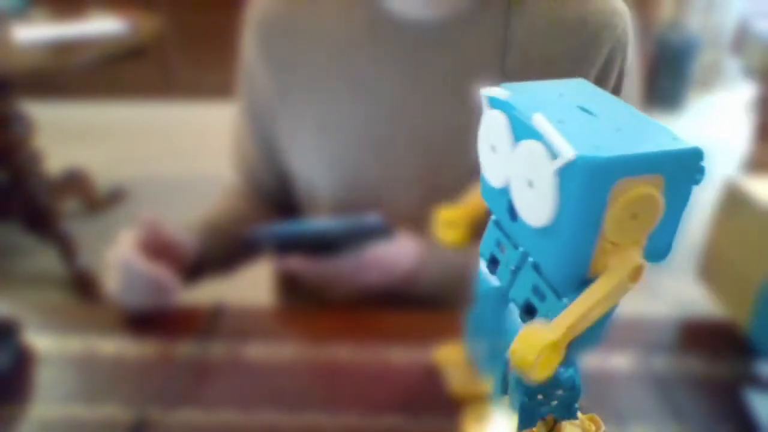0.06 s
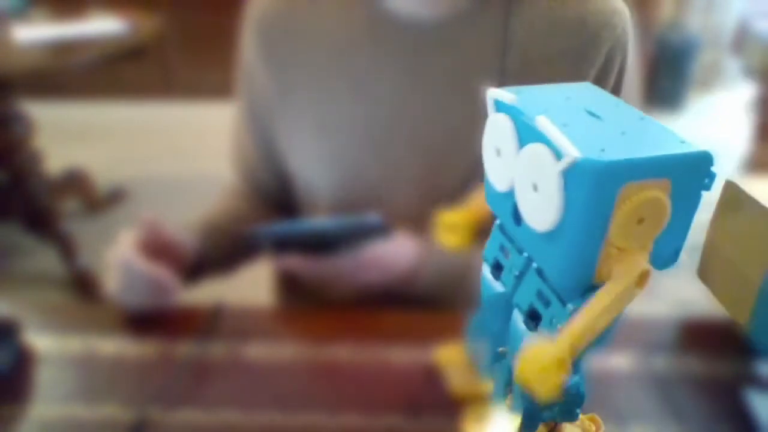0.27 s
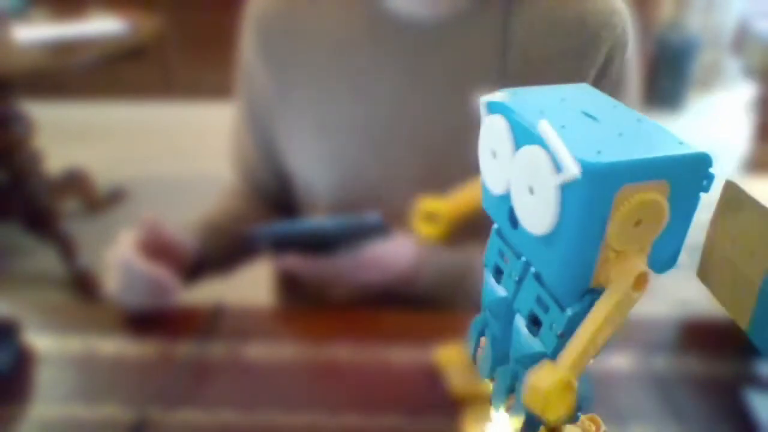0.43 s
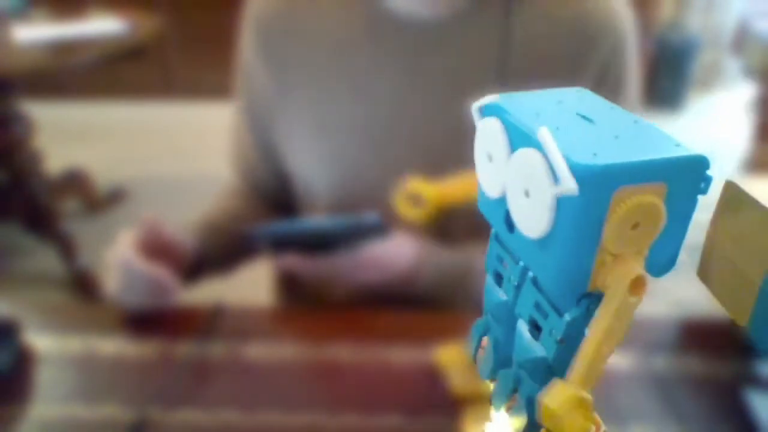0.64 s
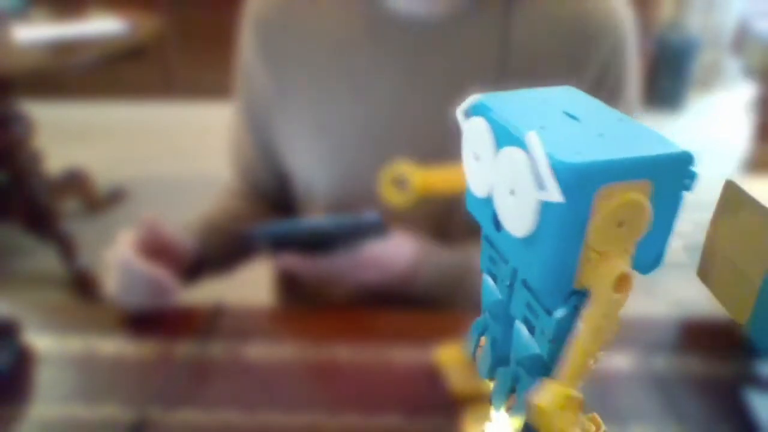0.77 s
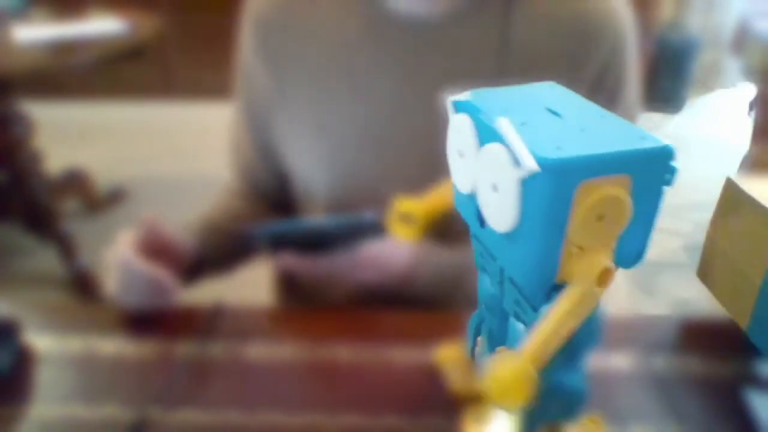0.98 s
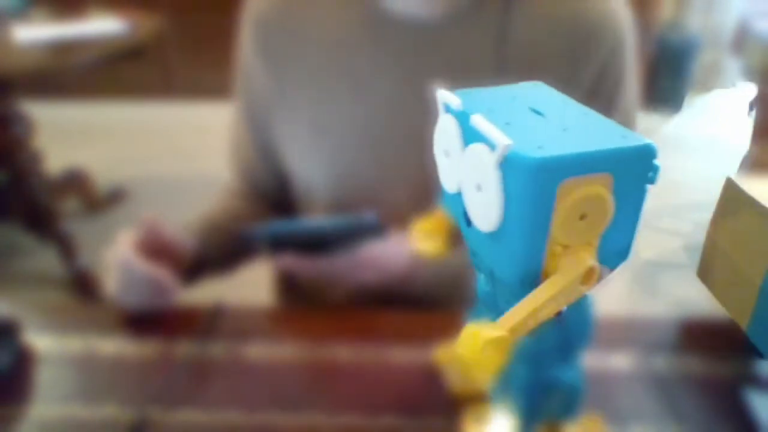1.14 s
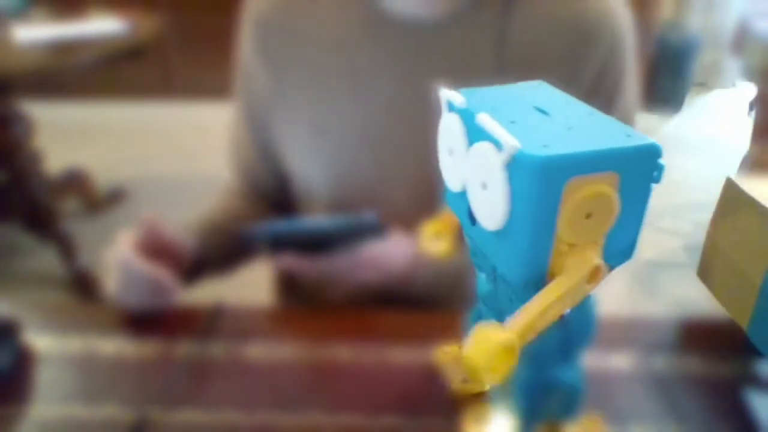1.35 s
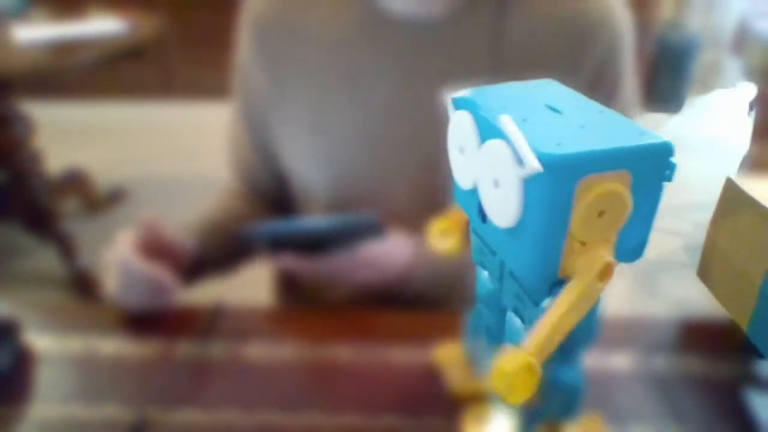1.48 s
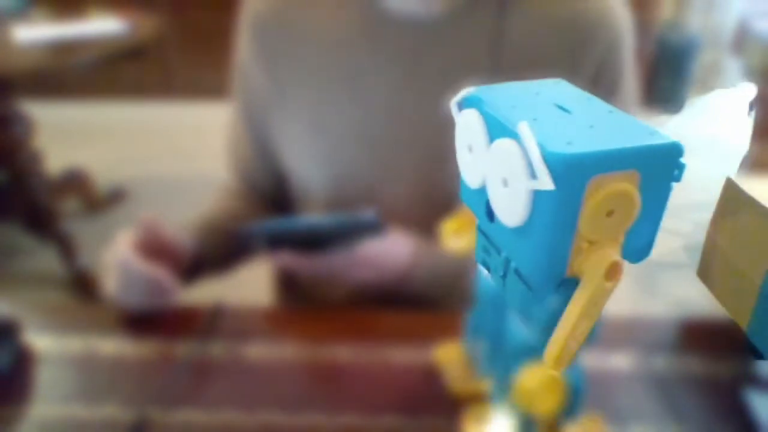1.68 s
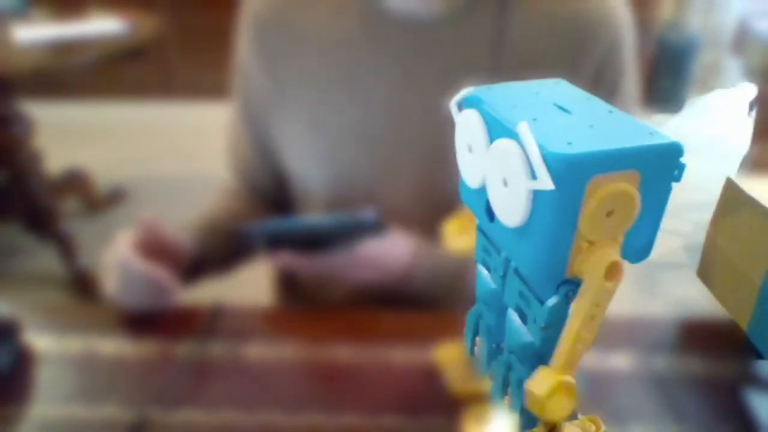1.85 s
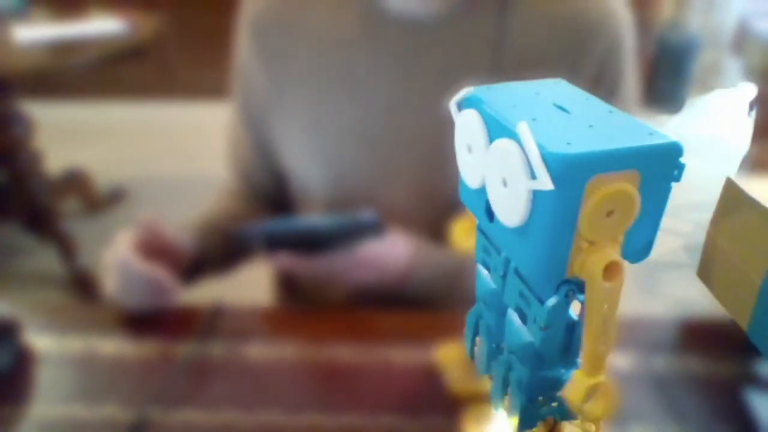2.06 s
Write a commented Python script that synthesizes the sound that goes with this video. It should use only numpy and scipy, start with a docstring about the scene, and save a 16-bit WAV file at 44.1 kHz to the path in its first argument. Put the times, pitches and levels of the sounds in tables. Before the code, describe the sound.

Close up in a quiet room, a little plastic robot's servos buzz at a high pitch, gears rattling and joints chirping. The uneven whirring gives way to brief, softer nudges and a faint ticking whine.

```python
"""A table in a quiet room, one microphone close to a small plastic robot moving its limbs. Servo gear teeth
click unevenly into the casing: a bright whirr on fast swings, a lower rattle under load. Joints chirp as they
stick and slip, gears squeal thinly, loose shell parts buzz briefly and the motors whine for a moment. Near the
end the servos tick and whine faintly, holding a pose. Behind it all lie a short room tail, low room noise and a
fading hum."""
import sys
import numpy as np
from scipy import signal
from scipy.fft import rfft, irfft, next_fast_len
from scipy.io import wavfile

SR = 44100
rng = np.random.default_rng(int(sys.argv[2]) if len(sys.argv) > 2 else 0)


def dump_mix(stems):
    """Bounce the given channels to the path in sys.argv[1] as a 16-bit WAV at rate SR."""
    frames = np.atleast_2d(stems).T  # one column per channel
    limited = np.clip(frames, -1, 1)  # hard clip at full scale
    pcm = np.round(limited * 32767).astype(np.int16)
    wavfile.write(sys.argv[1], SR, pcm)


N = 93403
T = np.arange(N) / SR

# fast limb swings: start t/s, end t/s, start level/dB, end level/dB, relative shrill level/dB
FAST_SWINGS = [(-.02, 0.028, -25, -39, -32), (0.027, 0.183, -36.5, -37.5, -21),
               (0.192, 0.234, -72, -41.5, -23), (0.793, 0.813, -41, -37, -19),
               (0.808, 0.882, -36.5, -31.5, -14), (0.89, 0.973, -39, -33.5, -24.5),
               (0.981, 1.026, -32.5, -34, -19), (1.038, 1.183, -36, -38, -14)]
# slow limb swings: start t/s, end t/s, start level/dB, end level/dB
SLOW_MOVES = [(1.688, 1.708, -50.5, -52.5), (1.87, 1.9, -63.5, -58), (1.899, 1.945, -49.5, -53),
              (1.945, 1.99, -55, -60), (2.012, 2.045, -53.5, -59), (2.072, 2.11, -51.5, -44)]
# small nudges of position: start t/s, end t/s, start level/dB, end level/dB
NUDGE_MOVES = [(1.195, 1.255, -57, -46), (1.315, 1.335, -38, -51), (1.362, 1.395, -44.5, -45),
               (1.49, 1.503, -50, -49.5), (1.503, 1.528, -43, -44), (1.53, 1.565, -50.5, -51.5),
               (1.628, 1.65, -71, -50)]
# rattle of the gear train under load: t/s, level/dB
LOAD_LEVELS = [(0, -46.5), (.19, -44.5), (.26, -53.5), (.3, -42), (.44, -42.5), (.53, -41), (.615, -37.5),
               (.65, -39), (.7, -39.5), (.742, -50), (.775, -45.5), (.792, -51), (.835, -39.5), (.92, -47),
               (1.0, -48.5), (1.05, -57), (1.18, -46), (1.28, -65), (1.39, -49), (1.42, -67.5), (1.82, -69),
               (1.86, -61)]
# low rumble of the casing: t/s, level/dB
RUMBLE_LEVELS = [(0, -64), (.34, -60.5), (.46, -60.5), (.62, -58), (.67, -69.5), (.76, -71.5), (.86, -58),
                 (1.0, -66), (1.04, -92), (1.29, -80.5), (1.33, -63.5), (1.45, -77.5), (1.8, -93.5),
                 (1.92, -78), (2.12, -72)]
# gear resonances in the whirr: f/Hz, relative level/dB
GEAR_WHINES = [(4820, -12), (5220, -9), (5900, -11)]
# joint chirps: centre t/s, length t/s, level/dB, pitch f/Hz, relative lower mode level/dB
JOINT_CHIRPS = [(0.236, 0.019, -40.5, 5316, -10.5), (0.336, 0.012, -40, 5290, -24),
                (0.362, 0.01, -37, 5405, -29), (0.493, .018, -43, 5210, -6), (0.517, .012, -42, 5340, -9),
                (0.554, 0.017, -41.5, 5246, -5), (0.625, .028, -38, 5460, -39), (.692, 0.03, -40, 5115, -1),
                (1.237, 0.0081, -44, 5140, -0.5), (1.255, 0.0073, -42.5, 5060, -12),
                (1.302, 0.0069, -34.5, 5180, -19.5), (1.322, .013, -36, 5230, -7.5),
                (1.344, 0.0065, -48.5, 5190, -8), (1.367, 0.013, -47, 5250, -6.5),
                (1.389, 0.0042, -35.5, 5040, -12), (1.444, 0.016, -43, 5207, -13.5),
                (1.463, 0.017, -39, 5210, -14), (1.613, 0.014, -43, 5270, -14.5),
                (1.632, 0.0093, -37, 5187, -17.5), (1.922, 0.029, -46.5, 5134, -30)]
# gear squeals: centre t/s, length t/s, level/dB, pitch f/Hz, relative upper mode level/dB
GEAR_SQUEALS = [(0.021, 0.023, -37, 5855, -23), (0.707, 0.027, -44.5, 5760, 1.5),
                (1.167, .014, -37, 5850, -19), (1.648, .016, -48, 5840, -5.5), (1.676, 0.02, -55, 6170, 1),
                (1.699, 0.018, -41.5, 5830, -6.5), (1.747, .04, -63, 5920, -12)]
# buzzes of loose shell parts and short motor whines: centre t/s, length t/s, level/dB, pitch f/Hz
BUZZES_AND_WHINES = [(.272, 0.0044, -40.5, 3184), (.417, 0.011, -37, 3248), (0.477, 0.013, -44.5, 3206),
                     (0.549, 0.026, -42.5, 3320), (0.615, 0.0093, -42.5, 3140), (0.684, 0.024, -42, 3210),
                     (0.021, 0.016, -57.5, 1453), (0.14, 0.016, -63.5, 1424), (0.166, 0.01, -56, 1458),
                     (0.303, 0.017, -55.5, 2060), (0.345, .09, -63, 2258), (1.874, 0.036, -74, 2270),
                     (0.635, .06, -68.5, 1452), (0.97, 0.017, -52.5, 1469), (1.391, .03, -71, 1064),
                     (1.933, 0.049, -77, 1070), (2.108, 0.041, -65, 1067)]

# casing responses, one for each gear sound (the whirr's in two halves): f/Hz, relative level/dB
WHIRR_CASING_LOW = [(200, -40), (700, -37), (1150, -47.5), (1430, -46.5), (1700, -37.5), (2100, -20)]
WHIRR_CASING_HIGH = [(2400, -30.5), (2860, -28.5), (3130, -13), (3480, -22), (3830, -4), (4150, -11),
                     (4470, -6.5), (4820, 1), (5250, 2.5), (5620, 1.5), (5880, 5.5), (6150, -1),
                     (6450, -13), (7090, -15.5), (7400, -41)]
SHRILL_CASING = [(3000, -50), (6100, -16.5), (6500, 0), (7050, 8), (7400, -21.5)]
RATTLE_CASING = [(200, -48), (780, -41.5), (1200, -35), (1430, -9.5), (1800, -21.5), (2000, -15.5),
                 (2150, -16.5), (2280, -13.5), (2550, -25.5), (2950, -17.5), (3180, -1), (3550, -7),
                 (3850, -5), (4200, -8.5), (4700, -3), (5230, 4), (5700, -8), (6400, -7.5), (7000, -9),
                 (7450, -30)]
RUMBLE_CASING = [(100, -3.5), (250, -1.5), (390, -14.5), (470, 2), (560, -8.5), (780, -2.5), (950, -0.5),
                 (1060, 4.5), (1220, -8.5), (1400, -0.5), (1650, 1), (2600, -33.5)]
NUDGE_CASING = [(300, -38), (700, -32), (1060, -23.5), (1250, -25.5), (1500, -14.5), (2200, -12),
                (2800, -34), (3300, -13.5), (3900, 2), (4500, -5), (5250, 17.5), (5800, 1.5), (6500, -7),
                (7050, 2.5), (7500, -29)]
SLOW_CASING = [(500, -30.5), (2800, -23), (3250, -10), (3550, -22), (3800, 0), (4050, -15.5), (4380, 8),
               (4850, -13.5), (5170, 6.5), (5500, -5.5), (5850, 6.5), (6250, -20), (7000, -38), (7500, -45)]
HOLD_CASING = [(500, -29), (2900, -30), (3600, -26.5), (4950, -4.5), (5380, 10.5), (5650, -0.5), (5850, -4),
               (6200, -13), (7200, -37.5)]
# spectrum of the room noise: f/Hz, relative level/dB
ROOM_SPECTRUM = [(25, -49.5), (36, -24), (48, -2.5), (80, 2.5), (135, 2), (220, -5.5), (340, -2.5),
                 (480, -6.5), (600, -13.5), (1000, -20), (2000, -24), (3500, -17), (7000, -27)]

WHIRR_TEETH_HZ, RATTLE_TEETH_HZ, LIGHT_TEETH_HZ, HOLD_TEETH_HZ = 736.7, 371.2, 520, 340
SPIN_UP_S, COAST_S = 0.0054, 0.012
CASING_T60_S, CASING_RING_DB = 0.032, -4.5
MODE_SPACING_HZ, MODE_LAG_S, MODE_FLICKER_DB = 330, .0025, 2.0
CHIRP_LOWER_HZ, SQUEAL_UPPER_HZ, SCRAPE_DB = 3880, 6650, -13
HOLD_AT_S, HOLD_TICK_DB, HOLD_WHINE_HZ, HOLD_WHINE_DB = 1.6, -60, 3270, -74.5
ROOM_T60_S, ROOM_TAIL_DB, ROOM_NOISE_DB = 0.11, -15.5, -66.5
HUM_HZ, HUM_DB, HUM_WAVER_DB, HUM_FADE_S = 133.4, -68.5, 2, 0.7
LOW_CUT_HZ, TOP_HZ = 44, 7600


def fast_gears():
    """On fast swings rapid tooth strikes ring the casing: a whirr with wavering whines and a shrill top."""
    strikes = teeth(WHIRR_TEETH_HZ, jitter=0.27, scatter_db=1.0, rub=0.24, throb_db=-0.9)
    mesh = mode_flicker(strikes, rate=55)
    whirr = colour(mesh, WHIRR_CASING_LOW + WHIRR_CASING_HIGH)
    for hz, db in GEAR_WHINES:
        whirr += amp(db + 6 * walk(40)) * tone(hz * (1 + 0.011 * walk(20) + 0.00816 * walk(600)))
    swings = [row[:4] for row in FAST_SWINGS]
    shrill_swings = [(start, end, first + top, last + top) for start, end, first, last, top in FAST_SWINGS]
    return unit(whirr) * drive(swings) + colour(mesh, SHRILL_CASING) * drive(shrill_swings)


def loaded_gears():
    """Under load slower, more uneven strikes make the casing rattle and rumble."""
    strikes = teeth(RATTLE_TEETH_HZ, jitter=.3, scatter_db=3.0, rub=0.36, throb_db=-1)
    mesh = mode_flicker(strikes, rate=110)
    rattle = colour(mesh, RATTLE_CASING) * amp(np.interp(T, *np.transpose(LOAD_LEVELS)))
    rumble = colour(mesh, RUMBLE_CASING) * amp(np.interp(T, *np.transpose(RUMBLE_LEVELS)))
    return rattle + rumble


def light_gears():
    """On nudges and slow swings the teeth rub about as much as they strike."""
    mesh = teeth(LIGHT_TEETH_HZ, jitter=.3, scatter_db=-1.0, rub=0.98, throb_db=2.5)
    return colour(mesh, NUDGE_CASING) * drive(NUDGE_MOVES) + colour(mesh, SLOW_CASING) * drive(SLOW_MOVES)


def teeth(hz, jitter, scatter_db, rub, throb_db):
    """Uneven tooth strikes, about hz a second, ring briefly in the plastic over sliding friction."""
    timing, force = rng.standard_normal((4000, 2)).T
    at = np.cumsum(np.exp(jitter * timing)) / hz * SR
    inside = at < N - 1
    strikes = np.bincount(at[inside].astype(int), amp(scatter_db * np.clip(force[inside], -2, 2)), N)
    strikes = unit(strikes - strikes.mean())
    decay = amp(-60 * np.minimum(T / CASING_T60_S, 3))
    # the ringing pattern drifts as the limb moves the contact point
    ring = sum(walk(8.795) * signal.fftconvolve(strikes, noise() * decay)[:N] for _ in range(8))
    return (strikes + amp(CASING_RING_DB) * unit(ring) + rub * noise()) * amp(throb_db * walk(90))


def mode_flicker(x, rate):
    """The contact point moves, so each band of casing modes has its own lag and swells and fades alone."""
    spectrum, f, out = rfft(x), np.arange(N // 2 + 1) * SR / N, 0
    for centre in np.arange(0, TOP_HZ, MODE_SPACING_HZ):
        band = np.cos(np.pi / 2 * np.clip((f - centre) / MODE_SPACING_HZ, -1, 1))
        lag = np.exp(-2j * np.pi * f * rng.uniform(0, MODE_LAG_S))
        out += irfft(spectrum * band * lag, N) * amp(MODE_FLICKER_DB * np.clip(walk(rate), -2, 2))
    return out


def drive(moves):
    """Servo envelope: each move spins up, runs along a level ramp and coasts down."""
    power = 0
    for start, end, first_db, last_db in moves:
        spin_up = np.clip((T - start) / SPIN_UP_S + .5, 0, 1)
        coast = np.exp(-np.maximum(T - end, 0) / COAST_S)
        ramp = amp(np.interp(T, [start, end], [first_db, last_db]))
        power += (spin_up * coast * ramp) ** 2
    return np.sqrt(power)


def joints():
    """Stick and slip drives chirps and squeals, two modes each, with a broad scrape under the chirps."""
    squeaks, contact = 0, 0
    for at, length, db, hz, lower_db in JOINT_CHIRPS:
        main = slip(at, length, hz, wobble=0.008, rasp=0.5, rate=830)
        lower = slip(at, length, CHIRP_LOWER_HZ, wobble=0.017, rasp=1.0, rate=370)
        squeaks += amp(db) * (main + amp(lower_db) * lower)
        contact += amp(db) * swell(at, length)
    for at, length, db, hz, upper_db in GEAR_SQUEALS:
        main = slip(at, length, hz, wobble=0.0093, rasp=1.0, rate=700)
        upper = slip(at, length, SQUEAL_UPPER_HZ, wobble=0.042, rasp=1.0, rate=600)
        squeaks += amp(db) * (main + amp(upper_db) * upper)
    return squeaks + amp(SCRAPE_DB) * contact * colour(noise(), NUDGE_CASING)


def slip(centre, length, hz, wobble, rasp, rate):
    """One mode driven by stick and slip swells and fades with unsteady pitch and ragged strength."""
    span = np.arange(int(max(centre - 4 * length, 0) * SR), int(min((centre + 4 * length) * SR, N)))
    steps = (span - span[0]) / SR * rate
    bend, push, pull = (np.interp(steps, np.arange(1024), row) for row in rng.standard_normal((3, 1024)))
    smooth = swell(centre, length)[span]
    ragged = smooth * (1 + rasp * (push + 1j * pull))
    ragged *= np.sqrt(2 * np.sum(smooth ** 2) / np.sum(abs(ragged) ** 2))  # rasp adds no energy
    phase = 2 * np.pi * np.cumsum(hz * (1 + wobble * bend)) / SR
    out = np.zeros(N)
    out[span] = np.imag(ragged * np.exp(1j * phase))
    return out


def buzzes_and_whines():
    """Loose plastic parts buzz and the motors whine briefly, each at its own pitch."""
    return sum(amp(db) * slip(at, length, hz, wobble=0.014, rasp=0.3, rate=380)
               for at, length, db, hz in BUZZES_AND_WHINES)


def holding_servos():
    """The servos tick and whine faintly while they hold a pose."""
    mesh = teeth(HOLD_TEETH_HZ, jitter=.15, scatter_db=6.0, rub=0.16, throb_db=1.5)
    ticking = amp(HOLD_TICK_DB) * colour(mesh, HOLD_CASING)
    whine = amp(HOLD_WHINE_DB + 4 * walk(64)) * tone(HOLD_WHINE_HZ * (1 + 0.029 * walk(240)))
    fade_in = np.clip((T - HOLD_AT_S) / 0.012, 0, 1)
    return (ticking + whine) * fade_in


def room_tone():
    """Low steady room noise behind the robot, with a faint wavering hum that dies away."""
    hum = amp(HUM_DB + HUM_WAVER_DB * walk(8.2)) * tone(HUM_HZ * (1 + 0.022 * walk(14)))
    return amp(ROOM_NOISE_DB) * colour(noise(), ROOM_SPECTRUM) + hum * np.exp(-T / HUM_FADE_S)


def colour(x, response):
    """Ring x through a response of (f/Hz, level/dB) points; the result has rms 1."""
    hz, db = np.array(response, float).T
    size = next_fast_len(N + 8192)
    size += size % 2
    f = np.maximum(np.arange(size // 2 + 1) * SR / size, 1)
    gain_db = np.interp(np.log(f), np.log(hz), db) - 60 * np.clip(f / TOP_HZ - 1, 0, 1)
    # minimum phase, so the ringing follows each strike
    cepstrum = irfft(np.log(amp(gain_db)))
    cepstrum[1:size // 2] *= 2
    cepstrum[size // 2 + 1:] = 0
    return unit(irfft(rfft(x, size) * np.exp(rfft(cepstrum)))[:N])


def swell(centre, length):
    """A rounded rise and fall with a peak of 1."""
    return 1 / np.cosh(np.minimum(2 * abs(T - centre) / length, 20)) ** 1.08


def walk(rate):
    """Random wander of rms 1, taking rate steps a second."""
    return unit(np.interp(T * rate, np.arange(8192), rng.standard_normal(8192)))


def tone(hz):
    """A sine that follows a changing pitch."""
    return np.sin(2 * np.pi * np.cumsum(hz) / SR)


def noise():
    """White noise."""
    return rng.standard_normal(N)


def amp(db):
    """Decibels to gain."""
    return 10 ** (np.asarray(db) / 20)


def unit(x):
    """Scale to rms 1."""
    return x / np.sqrt(np.mean(x ** 2))


def scene():
    """The robot close to the microphone, with a short room tail and the room tone behind it."""
    robot = fast_gears() + loaded_gears() + light_gears() + joints() + buzzes_and_whines() + holding_servos()
    tail = noise() * amp(-60 * T / ROOM_T60_S) * (T > .003)  # reflections start after 3 ms
    reflections = signal.fftconvolve(robot, tail / np.linalg.norm(tail))[:N]
    return (robot + amp(ROOM_TAIL_DB) * reflections + room_tone())[None]


def record(dry):
    """The recorder drops the deep bass and cuts off the top steeply."""
    low_cut = signal.butter(4, LOW_CUT_HZ, "highpass", fs=SR, output="sos")
    high_cut = signal.ellip(10, .3, 70, TOP_HZ, fs=SR, output="sos")
    return signal.sosfilt(high_cut, signal.sosfilt(low_cut, dry))


dry = scene()
out = record(dry)
dump_mix(out)
```